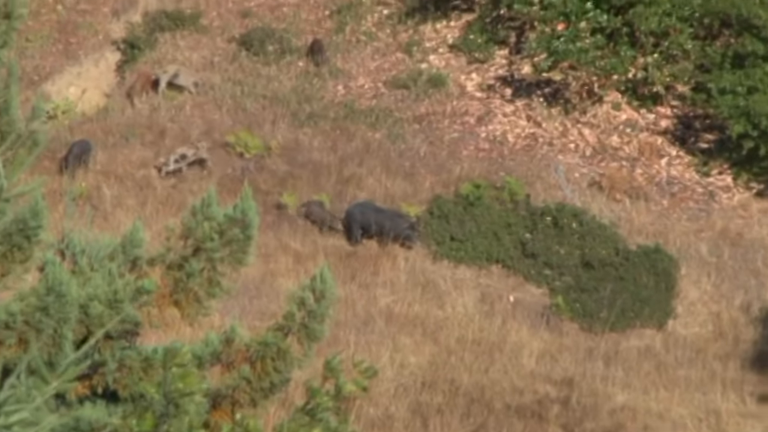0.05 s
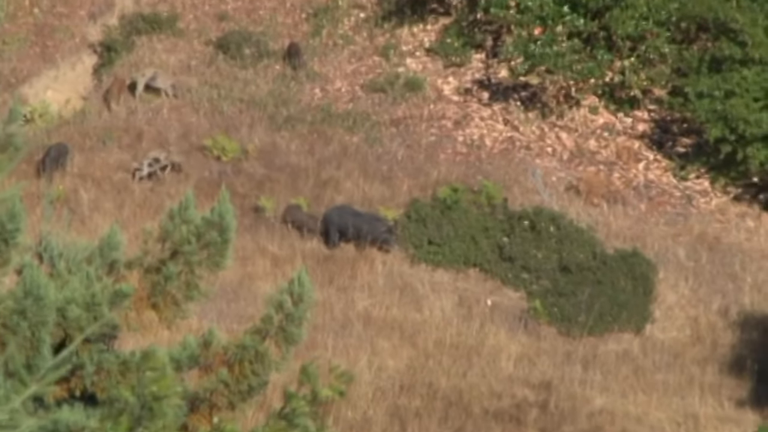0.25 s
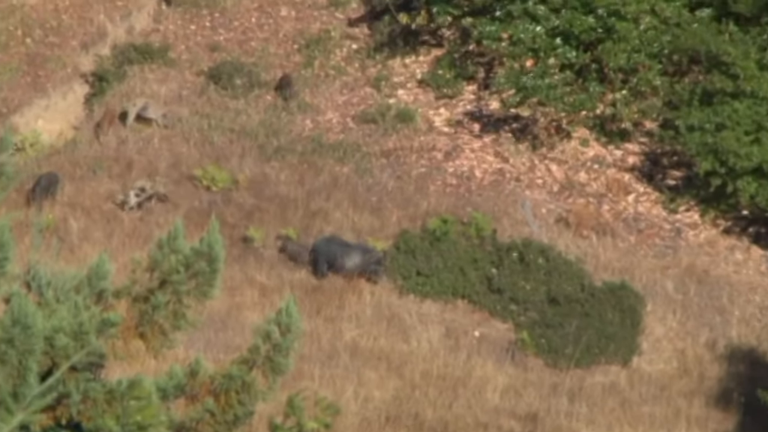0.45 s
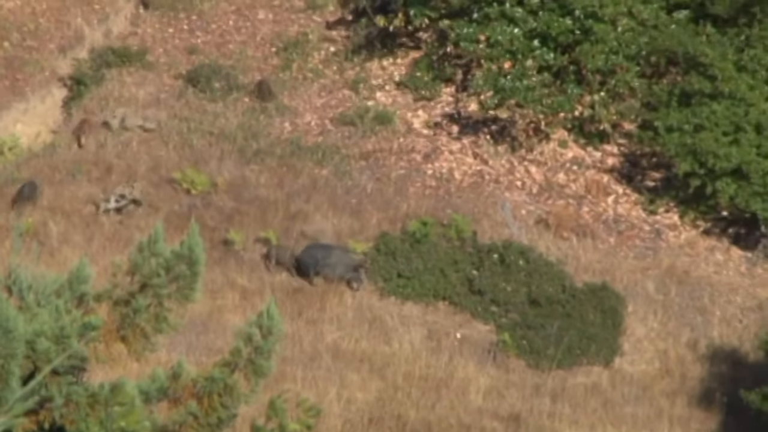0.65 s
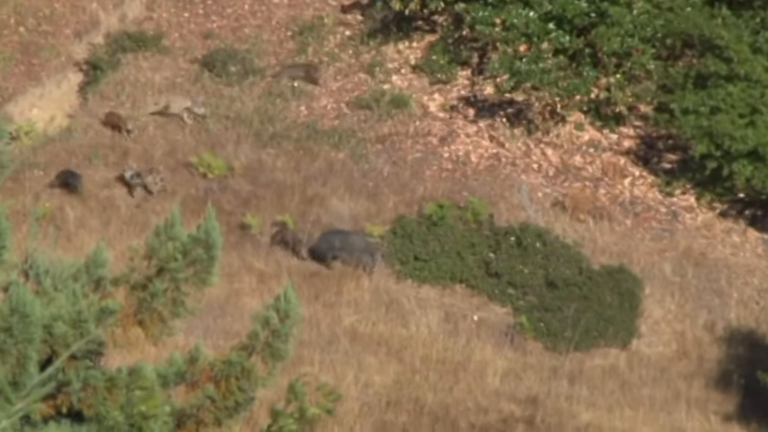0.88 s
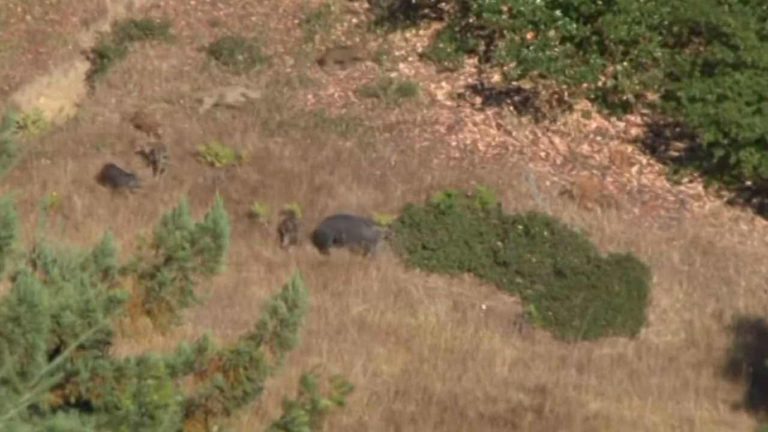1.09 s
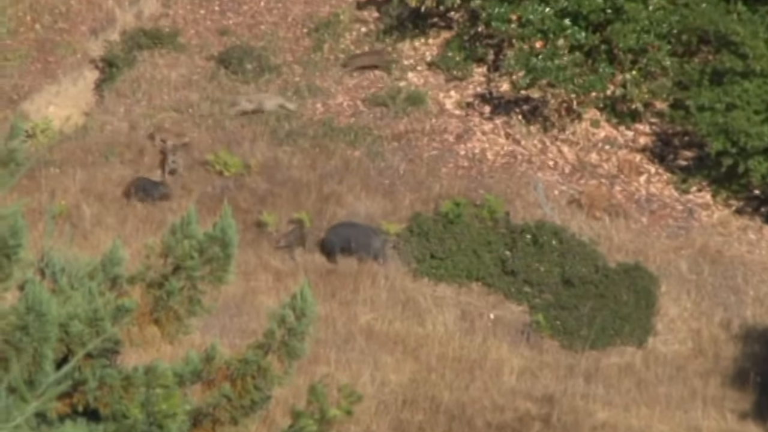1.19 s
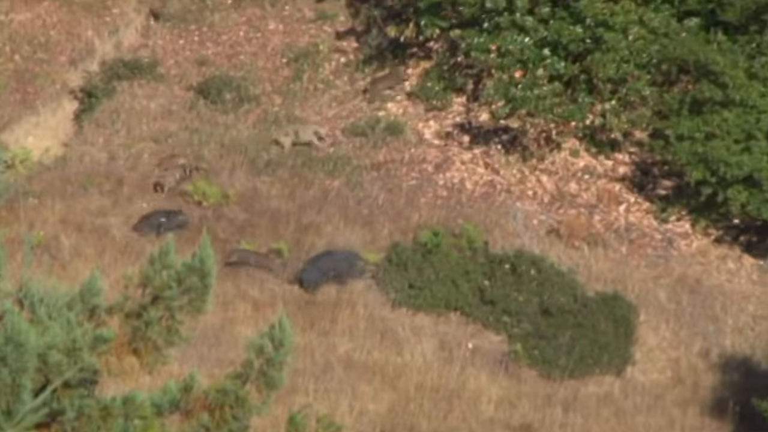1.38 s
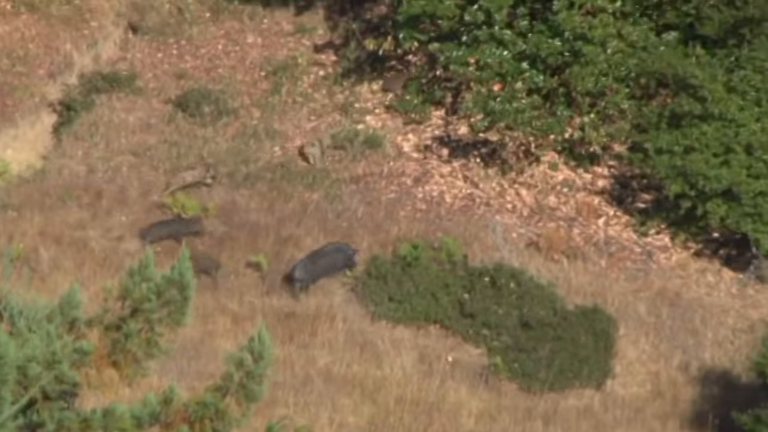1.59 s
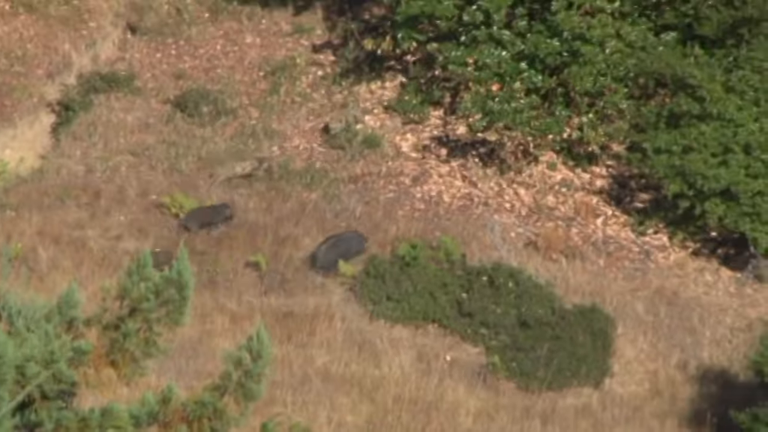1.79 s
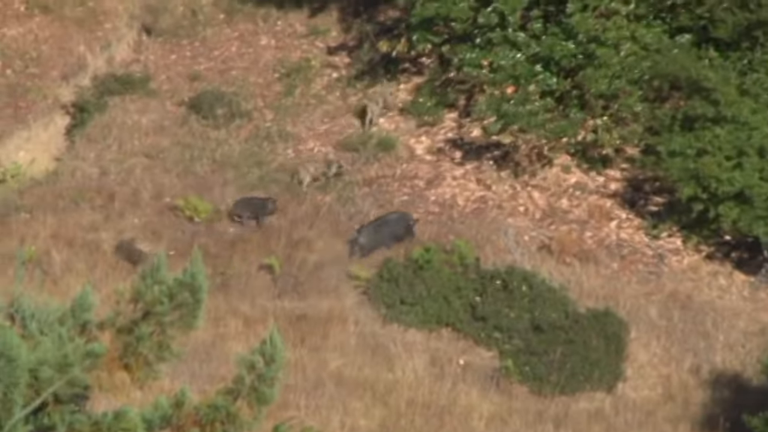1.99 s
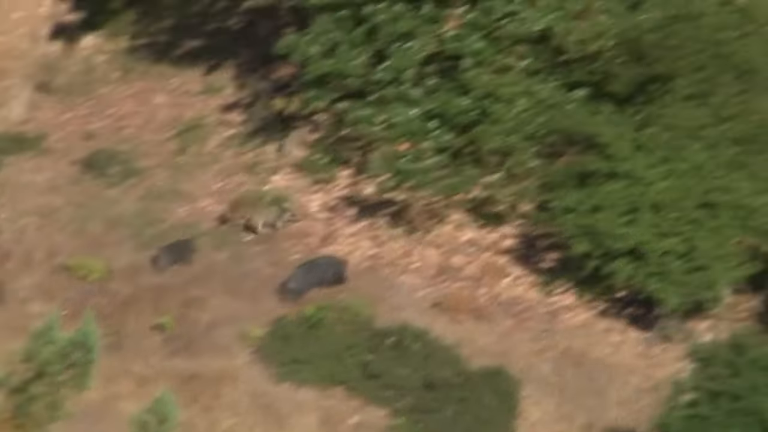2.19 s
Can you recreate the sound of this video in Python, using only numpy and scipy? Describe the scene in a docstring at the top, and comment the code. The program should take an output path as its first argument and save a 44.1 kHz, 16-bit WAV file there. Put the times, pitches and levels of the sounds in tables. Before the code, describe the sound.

In quiet open air a close rifle shot bursts out, overloading the microphone, which goes briefly dead; a low rumbling roll and bright wash of echoes return, swell again and fade, with a few tiny clicks.

```python
"""One rifle shot beside the microphone on a quiet wooded hillside: a noisy action snap, a squared-off ringing
crack, short pressure pulses and the main blast. The blast stuns the microphone, which goes dead at once over a
constant faint self-noise and wakes into the echo; a brief faint hiss sounds just after the blast. The echo is
thousands of random small returns from trees and slopes, shaped into a low roll of the blast and a brighter wash
of the crack, arriving in waves with strong returns of one or several short rings. Small dry ticks, still air
and a thin high hiss lie around it."""
import sys
import numpy as np
from scipy import signal
from scipy.fft import rfft, irfft
from scipy.io import wavfile

SR = 44100
rng = np.random.default_rng(int(sys.argv[2]) if len(sys.argv) > 2 else 0)


def int16_out(signal):
    """Quantize to a 16-bit WAV file."""
    q = np.round(np.clip(np.atleast_2d(signal).T, -1, 1) * 32767)
    wavfile.write(sys.argv[1], SR, q.astype(np.int16))


N = 99225
TIME = np.arange(N) / SR


def amp(db):
    """Turn dB into gain."""
    return 10 ** (np.asarray(db) / 20)


def rms_one(x):
    """Scale to rms 1."""
    return x / np.sqrt(np.mean(x ** 2) + 1e-20)


def noise():
    """White noise over the whole scene."""
    return rng.standard_normal(N)


def curve(rows, column):
    """Join one column of a table by straight lines in time."""
    table = np.array(rows)
    return np.interp(TIME, table[:, 0], table[:, column])


def band(x, low_hz, high_hz):
    """Keep the band between two frequencies."""
    edges = [low_hz, min(high_hz, .45 * SR)]
    return signal.sosfilt(signal.butter(2, edges, "band", fs=SR, output="sos"), x)


def coloured(x, spectrum):
    """Give x the spectrum with a causal, minimum-phase filter; rms 1."""
    hz, db = np.transpose(spectrum)
    size = 2 ** 17
    bins_hz = np.arange(size // 2 + 1) * SR / size
    log_gain = np.interp(np.log(bins_hz + 1), np.log(hz), db) * np.log(10) / 20
    # folding the cepstrum forward in time makes the filter minimum-phase
    cepstrum = irfft(log_gain)
    cepstrum[1:size // 2] *= 2
    cepstrum[size // 2 + 1:] = 0
    response = np.exp(rfft(cepstrum))
    return rms_one(irfft(rfft(x, size) * response)[:N])


def drift(rate_hz):
    """Slow random wander of rms 1: noise through two equal one-pole low-passes."""
    r = np.exp(-2 * np.pi * rate_hz / SR)
    wander = signal.lfilter([1], [1, -2 * r, r * r], rng.standard_normal(N + SR))
    return rms_one(wander[SR:])   # the first second lets the filter settle


def scatter(per_s, spread_db, clump_db, clump_hz):
    """Random returns of either sign and uneven size whose strength wanders in clumps."""
    sizes = amp(spread_db * np.minimum(rng.exponential(1, N), 4)) * rng.choice([-1, 1], N)
    arrivals = rng.random(N) < per_s / SR
    return sizes * arrivals * amp(clump_db * drift(clump_hz)) + 1e-18


def blip(start_s, db, hz, cycles):
    """A sine that swells for a quarter cycle, then dies by 60 dB over the given cycles."""
    turns = np.maximum(TIME - start_s, 0) * hz
    swell = np.minimum(4 * turns, 1)
    decay = amp(-60 * np.maximum(turns - .25, 0) / cycles)
    return amp(db) * np.sin(2 * np.pi * turns) * swell * decay


MAIN_S, MAIN_DB = .2115, 14
MAIN_SPAN_S = .0014   # time scale of the pulse; the echo is let in once it has passed


def main_blast():
    """The strongest pressure pulse: a steep rise, a fast fall and a slight dip below rest."""
    u = (TIME - MAIN_S) / MAIN_SPAN_S
    return amp(MAIN_DB) * np.interp(u, [0, .1, .2, .36, .44, .55], [0, .1, 1, .12, -.08, 0])


# short pressure pulses leading up to the main blast: (time [s], level [dB], length [s])
LEADING_PULSES = [(0.2043, -10, 0.0011), (0.2059, -8.5, 0.00091), (0.2072, -15, 0.0013), (0.209, -7, 0.002),
                  (.2104, -9.5, 0.0013)]


def leading_pulses():
    """Pressure climbs, drops below rest and settles slightly above it."""
    total = np.zeros(N)
    for start_s, db, length_s in LEADING_PULSES:
        u = (TIME - start_s) / length_s
        total += amp(db) * np.interp(u, [0, .5, .62, 1], [0, 0.96, -0.85, 0.082])
    return total


CRACK_S, CRACK_DB, CRACK_HOLD_S, CRACK_FADE_S = .2046, -9, .0026, .0009
CRACK_HZ, CRACK_SAG_HZ_PER_S, CRACK_WIDTH_HZ = 4200, 350000, 1000
CRACK_HISS_DB = -16   # relative to the ring


def crack():
    """A squared-off ring, sagging and wandering in pitch, with hiss, until the main blast."""
    since = TIME - CRACK_S
    sounding = (since > 0) * (TIME < MAIN_S)
    hold = sounding * np.exp(-np.maximum(since - CRACK_HOLD_S, 0) / CRACK_FADE_S)
    sag_hz = CRACK_SAG_HZ_PER_S * np.clip(since, 0, .006)
    pitch_hz = CRACK_HZ - sag_hz + CRACK_WIDTH_HZ * drift(490)
    phase = 2 * np.pi * np.cumsum(pitch_hz) / SR
    ring = hold * np.tanh(4.0 * np.sin(phase))
    hiss = amp(CRACK_HISS_DB) * rms_one(band(noise(), 1000, 10200))
    return amp(CRACK_DB) * (ring + sounding * hiss)


SNAP_S, SNAP_DB, SNAP_RISE_S, SNAP_HZ = .2012, -18.5, 0.00095, 3200


def action_snap():
    """Noise swells exponentially, then holds until the crack cuts it off."""
    swell = np.exp(np.minimum(TIME - SNAP_S, 0) / SNAP_RISE_S) * (TIME < CRACK_S)
    grain = band(noise(), SNAP_HZ / 2, SNAP_HZ * 1.5) + .15 * noise()
    return amp(SNAP_DB) * swell * rms_one(grain)


# echo from the slopes: (time [s], low roll level [dB], deep bass level [dB])
SLOPE_ECHO = [(.305, -36, -50), (.335, -28, -54), (.36, -31, -49), (.42, -30.5, -57), (.47, -26.5, -56),
              (.514, -35, -52), (.63, -44, -59.5), (.72, -45, -50), (.76, -43, -43), (.8, -46, -68),
              (.866, -49.5, -58), (1.03, -44, -62), (1.1, -47, -58), (1.22, -44.5, -52), (1.28, -41, -59.5),
              (1.4, -38, -56), (1.53, -37, -54), (1.75, -37.5, -62), (1.9, -38.5, -58), (2.06, -43, -76),
              (2.25, -46, -59)]
# tone of the roll: (frequency [Hz], relative level per Hz [dB])
ROLL_TONE = [(53, -56.5), (90, -18.5), (173, -3), (253, -3.5), (361, 0.5), (598, -1), (647, 0.5),
             (950, -9.5), (1240, -48), (2090, -120)]


def slope_roll():
    """Sparse, uneven slope returns merge into a lumpy low roll over wavering deep bass."""
    hits = scatter(1500, spread_db=2.5, clump_db=2.0, clump_hz=26.6)
    roll = amp(curve(SLOPE_ECHO, column=1)) * coloured(hits, ROLL_TONE)
    low_hz, high_hz = 59.4, 184
    bass_level = amp(curve(SLOPE_ECHO, column=2) + 1.8 * drift(6.7))
    deep = band(band(noise(), low_hz, high_hz), low_hz, high_hz)
    return roll + bass_level * rms_one(deep)


# echo of the crack in waves: (time [s], wash level [dB], treble level [dB])
CRACK_WAVES = [(.328, -33.5, -34.5), (.35, -27, -34.5), (.372, -31, -33.5), (.39, -34.5, -39),
               (.47, -33, -40.5), (.514, -39.5, -44), (.63, -47.5, -56), (.72, -49, -57.5),
               (.794, -47.5, -56.5), (.866, -52.5, -68), (.912, -48, -60), (.924, -40.5, -55),
               (.97, -39.5, -56), (1.03, -37, -54), (1.096, -42.5, -61), (1.218, -45.5, -54),
               (1.272, -46.5, -65), (1.3, -45, -53), (1.398, -44.5, -48.5), (1.5, -47, -52),
               (1.55, -48, -56), (1.6, -47.5, -52), (1.716, -44, -52), (1.75, -53.5, -61), (1.8, -46, -55),
               (1.9, -49.5, -47.5), (1.96, -48, -55), (1.985, -41.5, -46.5), (2.03, -49, -50.5),
               (2.062, -57.5, -65), (2.25, -57.5, -82)]
# tone of the wash: (frequency [Hz], relative level per Hz [dB])
WASH_TONE = [(1120, -28), (1900, -3.5), (2010, -3.5), (2380, -0.5), (3060, -3.5), (4040, -7), (6000, -21.5),
             (7800, -48), (13200, -120)]
# tone of the treble: (frequency [Hz], relative level per Hz [dB])
TREBLE_TONE = [(2060, -32), (3500, -6.5), (3860, -8.5), (4090, -3), (7880, -9.5), (10700, -22),
               (14000, -30)]


def crack_wash():
    """Dense returns of the crack form a bright wash, denser ones its treble."""
    wash_hits = scatter(6000, spread_db=0.5, clump_db=0.9, clump_hz=37)
    wash = amp(curve(CRACK_WAVES, column=1)) * coloured(wash_hits, WASH_TONE)
    treble_hits = scatter(15000, spread_db=1.5, clump_db=1.4, clump_hz=73)
    treble = amp(curve(CRACK_WAVES, column=2)) * coloured(treble_hits, TREBLE_TONE)
    return wash + treble


# high sheen from the nearest trees, soon dying: (time [s], level [dB])
SHEEN_LEVEL = [(.328, -37), (.35, -42), (.39, -47), (.47, -47), (.514, -56), (.63, -70), (.9, -75)]


def tree_sheen():
    """Dense, uneven returns from the nearest trees, kept to a high band."""
    hits = scatter(15000, spread_db=5.0, clump_db=1.0, clump_hz=44)
    return amp(curve(SHEEN_LEVEL, column=1)) * rms_one(band(hits, 7400, 12000))


# middle of the echo, between roll and wash: (time [s], level [dB])
MIDDLE_LEVEL = [(.33, -33), (.345, -26), (.378, -31), (.47, -36.5), (.5, -41.5), (.682, -49.5),
                (.89, -50.5), (.944, -43.5), (1.072, -43.5), (1.094, -48.5), (1.41, -42.5), (1.944, -46.5),
                (2.008, -42), (2.03, -48.5), (2.25, -50.5)]


def echo_middle():
    """Band-passed random returns bridge the roll and the wash."""
    hits = scatter(3000, spread_db=2.0, clump_db=0.8, clump_hz=42)
    return amp(curve(MIDDLE_LEVEL, column=1)) * rms_one(band(hits, 917, 1910))


# rings that make up the strong returns of the blast: (time [s], level [dB], pitch [Hz])
RETURN_RINGS = [(.3175, -19, 730), (.3215, -17, 755), (.349, -15.5, 334), (.358, -15.5, 600),
                (.364, -24, 610), (.3835, -16, 510), (0.3974, -18, 383), (.412, -20, 610),
                (.4645, -19, 594), (0.477, -12, 1320), (0.481, -5.5, 700), (0.4808, -13, 1480),
                (0.4804, -18.5, 315), (.489, -19, 597), (.504, -22, 555), (0.617, -29, 400),
                (0.781, -30, 282), (1.368, -24.5, 496), (1.396, -23, 565), (1.466, -27, 387),
                (1.544, -23, 487), (1.938, -32, 490)]


def strong_returns():
    """Strong returns of the blast, each made of one or several short pitched rings."""
    return sum(blip(start_s, db, hz, cycles=7.5) for start_s, db, hz in RETURN_RINGS)


def echo():
    """All returns from trees and slopes, let in after the main blast."""
    returns = slope_roll() + crack_wash() + tree_sheen() + echo_middle() + strong_returns()
    return returns * (TIME > MAIN_S + MAIN_SPAN_S)


# rings that make up the small dry ticks nearby: (time [s], level [dB], pitch [Hz], decay [cycles])
TICK_RINGS = [(.0955, -54, 4200, 24), (.5432, -16.5, 2880, 11.5), (.9213, -29, 4130, 16),
              (1.892, -24, 11300, 21), (1.944, -31, 3940, 18), (1.949, -27, 5000, 11.2),
              (1.972, -22, 6560, 16), (1.9727, -18, 3640, 6.4), (1.9723, -22, 1500, 2),
              (2.0405, -32, 5000, 5), (2.082, -44, 4000, 5.3)]


def ticks():
    """Small dry ticks, each made of one or several quickly dying sines."""
    return sum(blip(*row) for row in TICK_RINGS)


# thin high hiss that swells late: (time [s], level [dB])
HISS_LEVEL = [(.6, -72), (1.2, -78), (1.9, -68), (2.25, -60)]


def high_hiss():
    """High band-passed noise, heard from the main blast on."""
    return amp(curve(HISS_LEVEL, column=1)) * rms_one(band(noise(), 5000, 11500)) * (TIME > MAIN_S)


# tone of the still air: (frequency [Hz], relative level per Hz [dB])
AIR_TONE = [(15, -41), (25, 5), (503, -8), (677, -10), (1330, -14), (3520, -12), (10100, -17),
            (16000, -20.5)]
AIR_DB = -69


def still_air():
    """Steady coloured noise beneath everything."""
    return amp(AIR_DB) * coloured(noise(), AIR_TONE)


def scene():
    """Still air, hiss, shot, echo and ticks on one channel."""
    background = still_air() + high_hiss()
    shot = action_snap() + crack() + main_blast() + leading_pulses()
    return (shot + echo() + ticks() + background)[None]


CEILING, STUN_LEVEL = .58, 2.5   # soft-clip ceiling and stunning pressure, as amplitudes
STUN_LAG_S, DEAD_S, WAKE_DB, WAKE_S = 0.00052, 0.075, -40, 0.015
SELF_NOISE_DB = -74
# a brief faint hiss just after the blast, fading out at its end
LIFT_DB, LIFT_S, LIFT_FADE_S = -43.5, 0.026, 0.012
# bass cuts of the microphone: (frequency [Hz], resonance [Q])
BASS_CUTS = [(63, 0.46), (28.6, 0.98)]


def record(dry):
    """Peaks soft-clip; excess pressure deadens the microphone until it wakes; bass and top are cut."""
    stun_s = np.argmax(np.abs(dry[0]) > STUN_LEVEL) / SR + STUN_LAG_S
    since = TIME - stun_s
    # the gain reopens from WAKE_DB, its shortfall in dB shrinking exponentially
    waking = amp(WAKE_DB * np.exp(-np.maximum(since - DEAD_S, 0) / WAKE_S))
    gain = np.where(since < 0, 1, (since > DEAD_S) * waking)
    clipped = CEILING * np.tanh(dry / CEILING)
    lift = amp(LIFT_DB) * (since > 0) * np.clip((LIFT_S - since) / LIFT_FADE_S, 0, 1)
    self_noise = rms_one(band(noise(), 180, 2500) + 0.46 * noise())
    x = gain * clipped + (lift + amp(SELF_NOISE_DB)) * self_noise
    for hz, q in BASS_CUTS:
        w = 2 * np.pi * hz
        b, a = signal.bilinear([1, 0, 0], [1, w / q, w * w], SR)
        x = signal.lfilter(b, a, x)
    # 70 dB down from 16600 Hz up
    return signal.sosfilt(signal.cheby2(12, 70, 16600, fs=SR, output="sos"), x)


dry = scene()
out = record(dry)
int16_out(out)
```